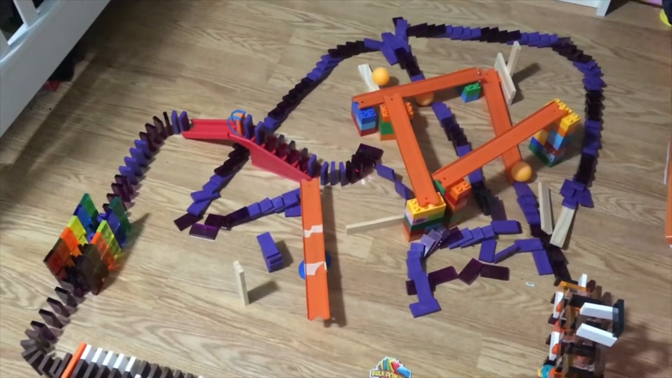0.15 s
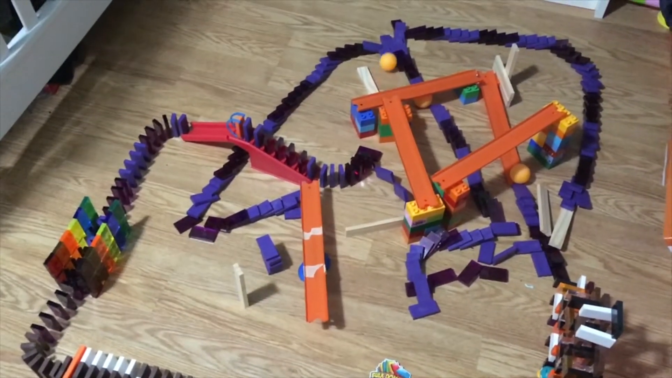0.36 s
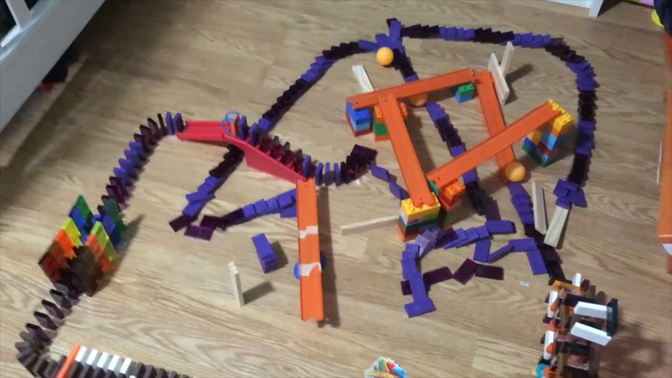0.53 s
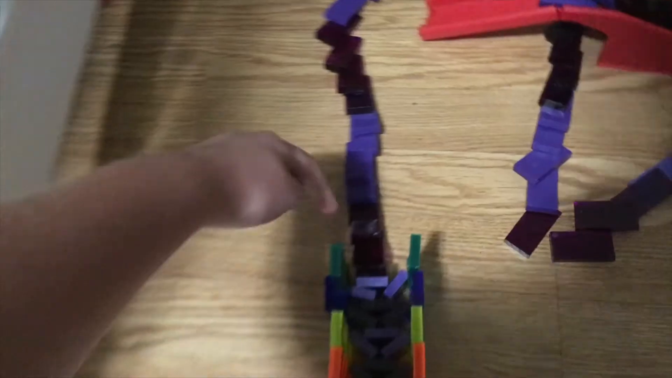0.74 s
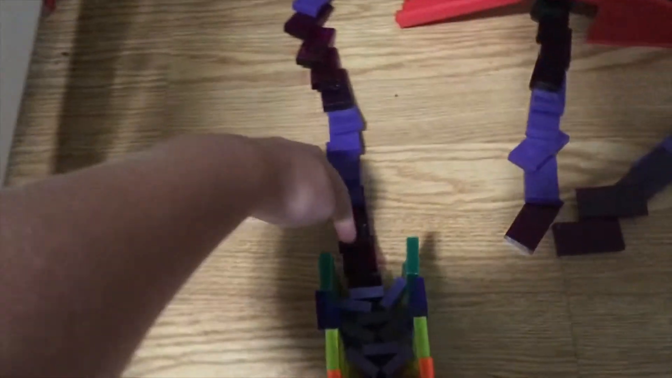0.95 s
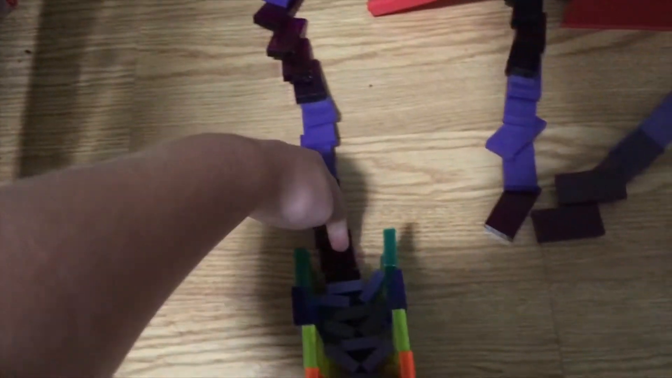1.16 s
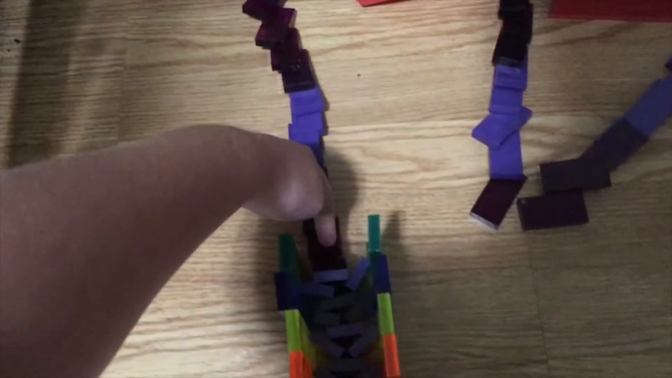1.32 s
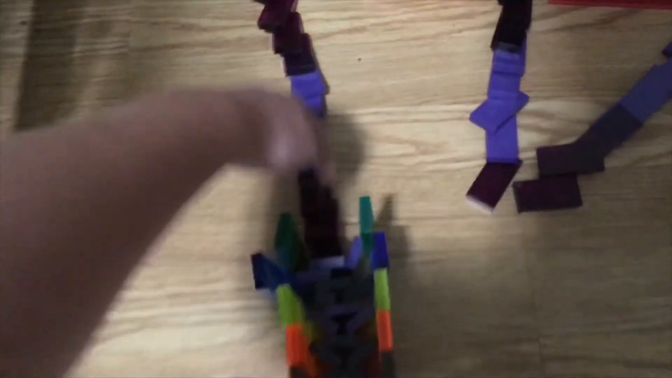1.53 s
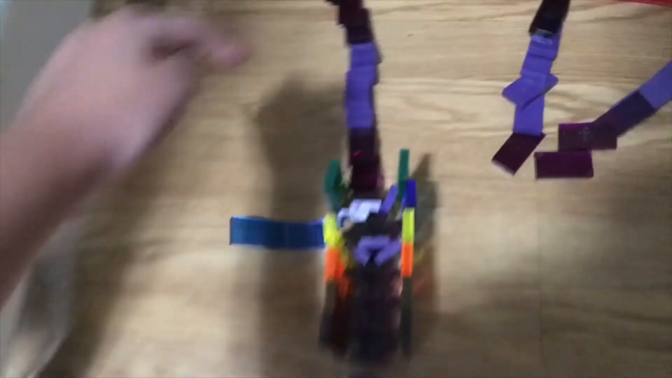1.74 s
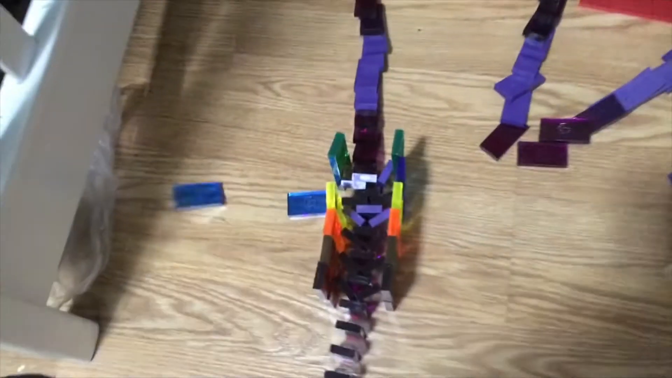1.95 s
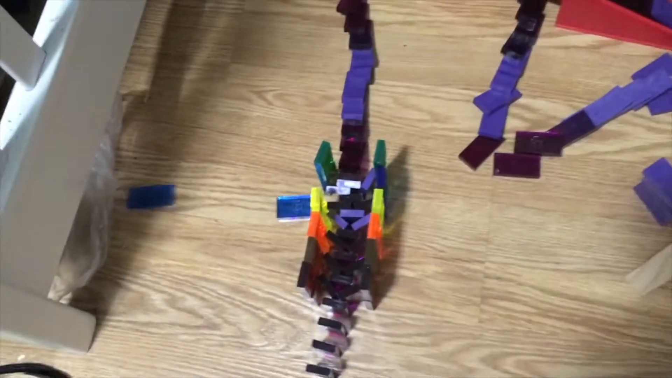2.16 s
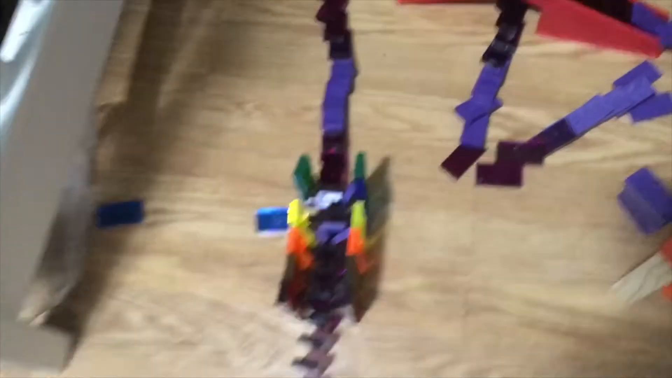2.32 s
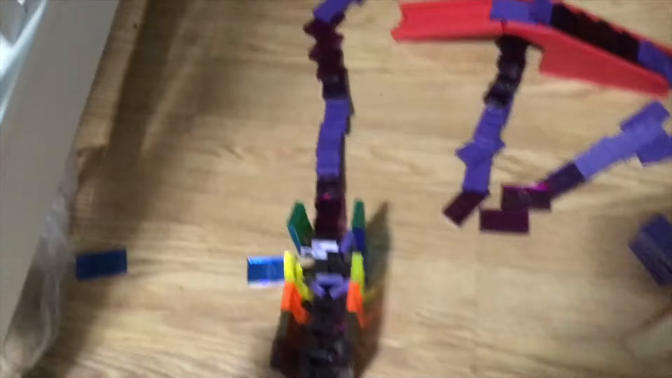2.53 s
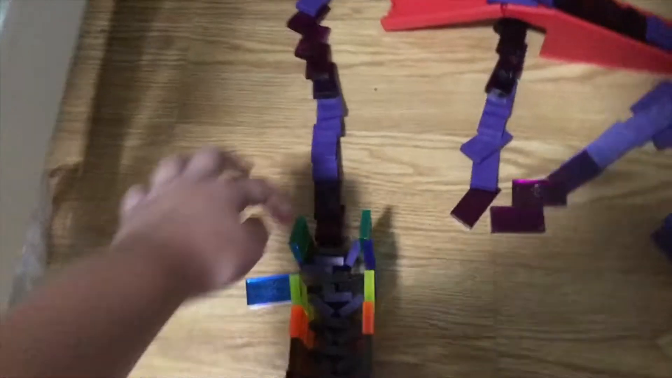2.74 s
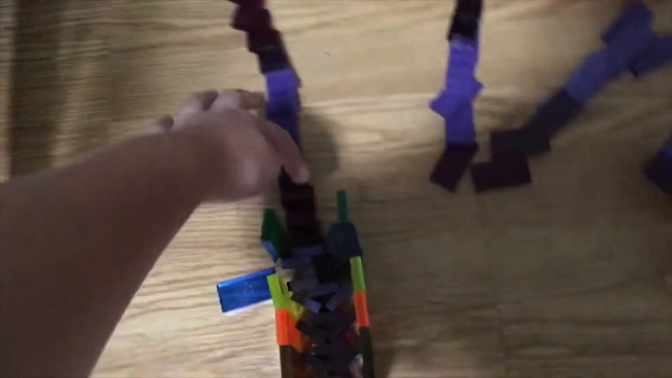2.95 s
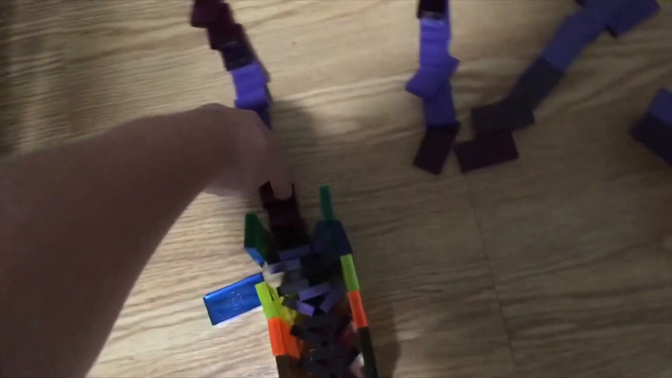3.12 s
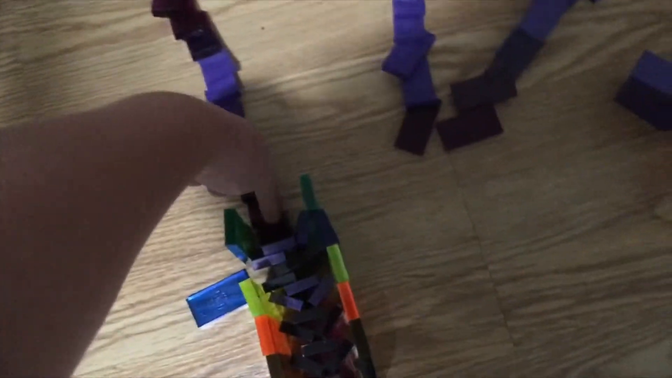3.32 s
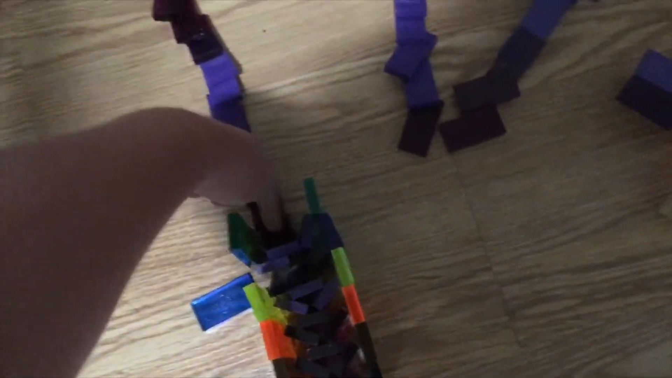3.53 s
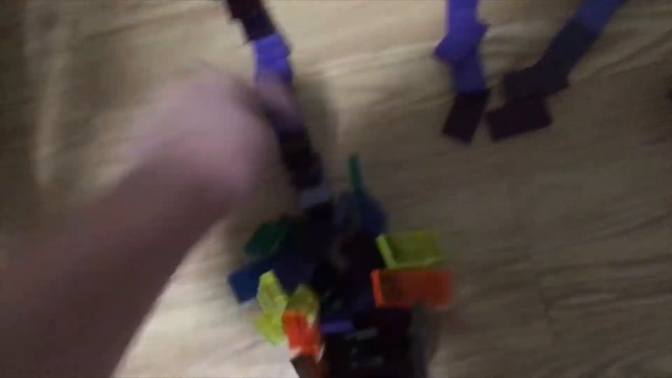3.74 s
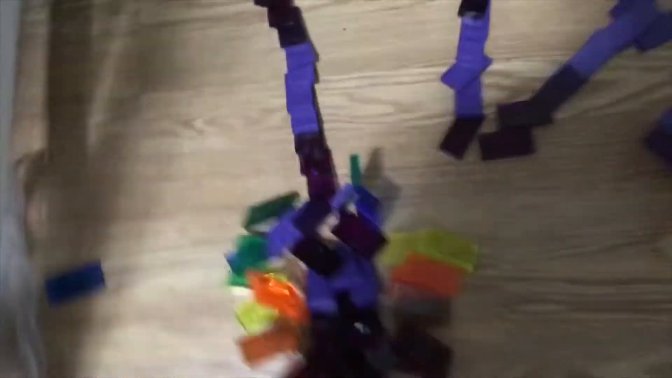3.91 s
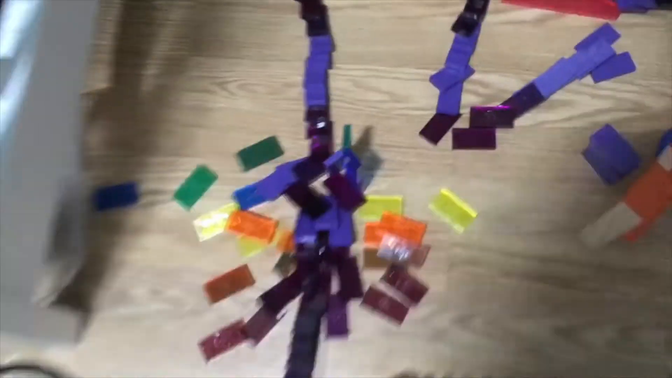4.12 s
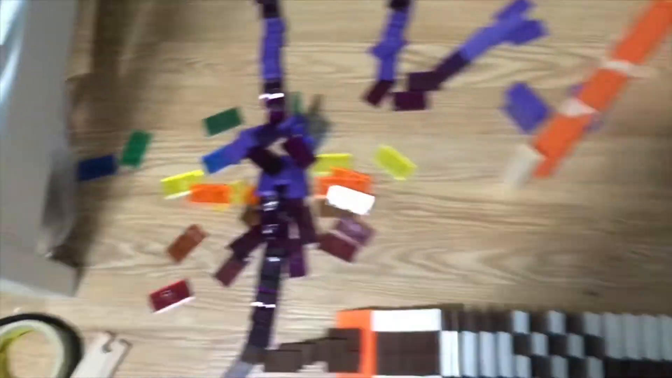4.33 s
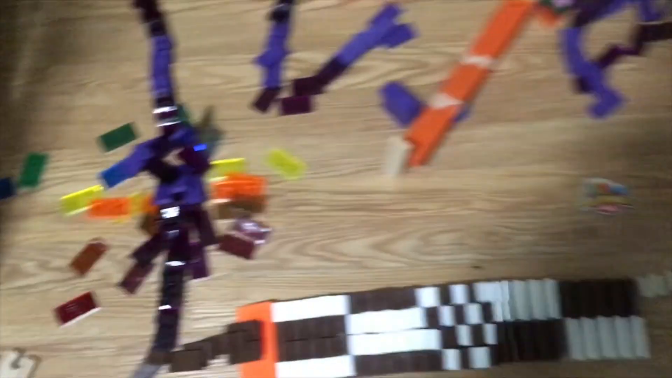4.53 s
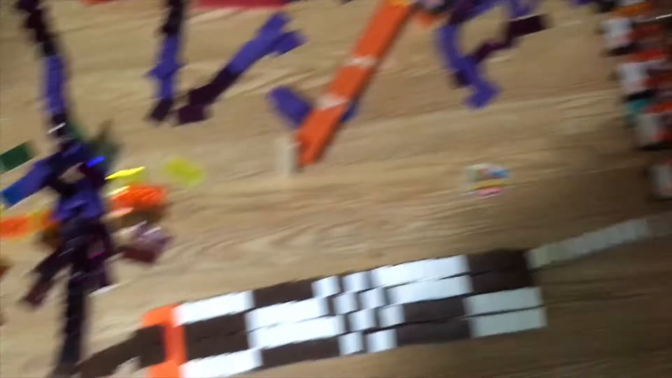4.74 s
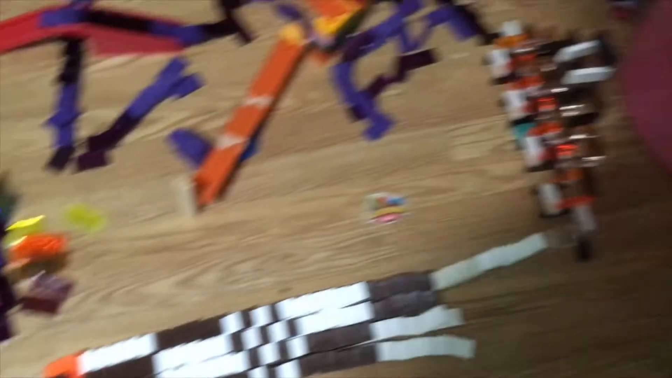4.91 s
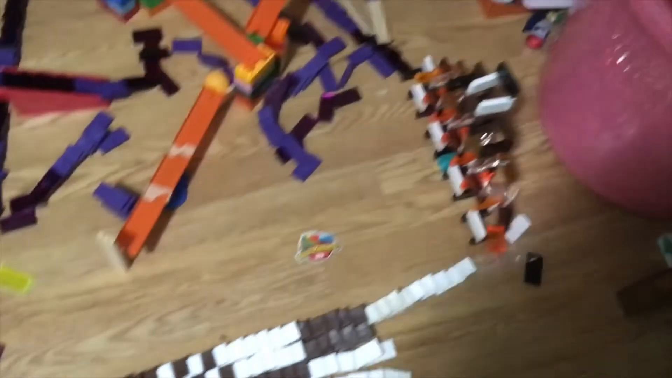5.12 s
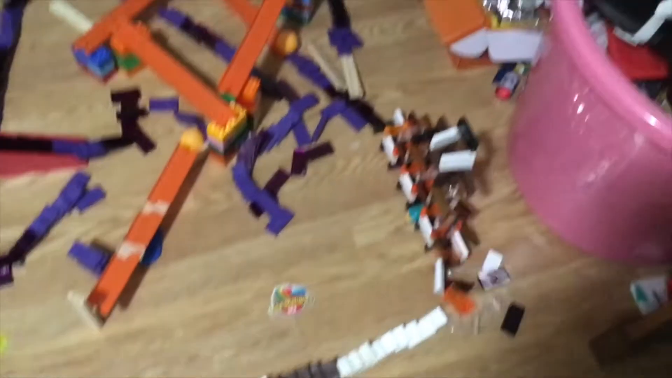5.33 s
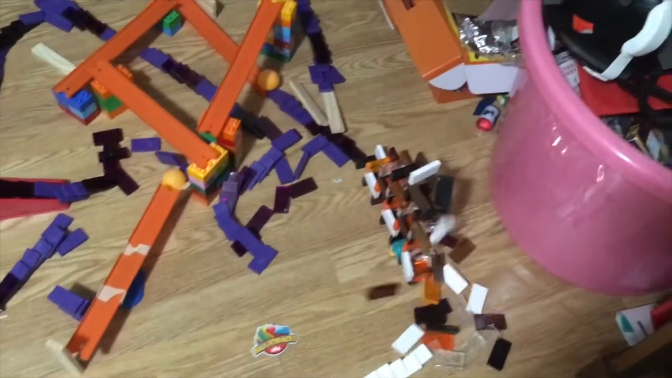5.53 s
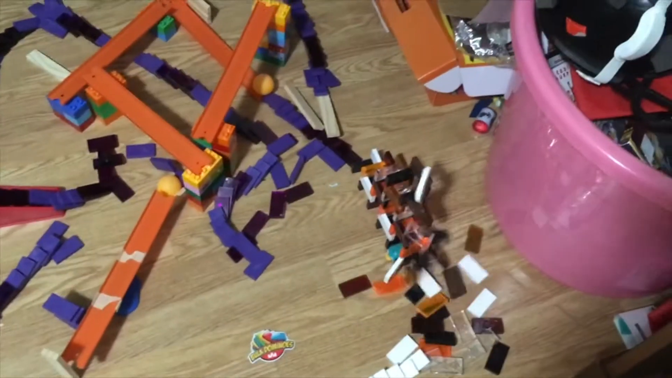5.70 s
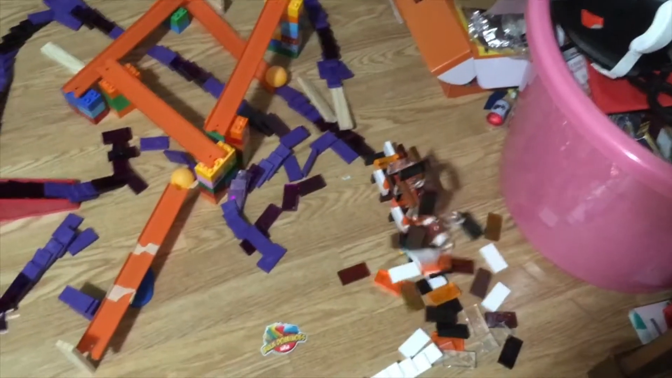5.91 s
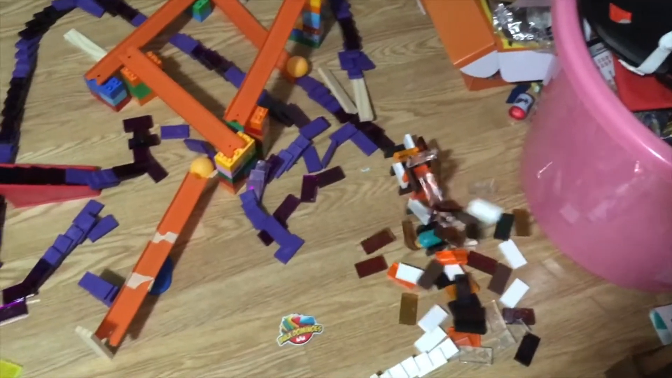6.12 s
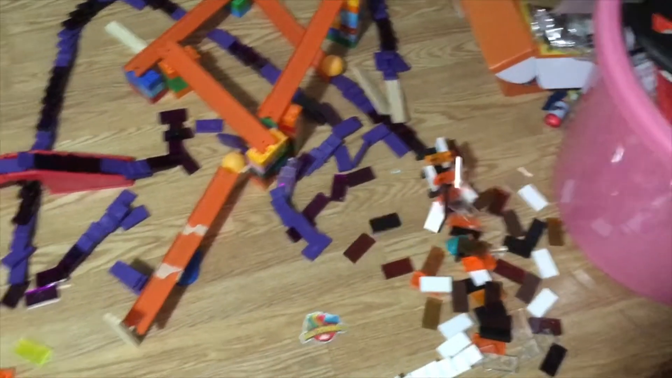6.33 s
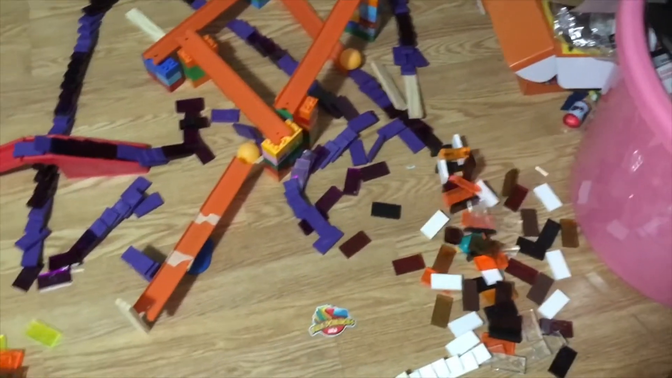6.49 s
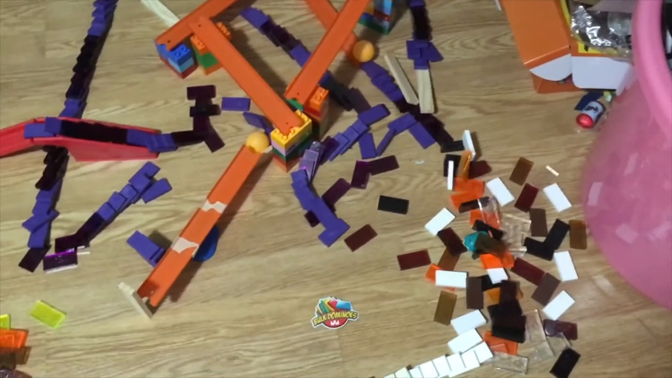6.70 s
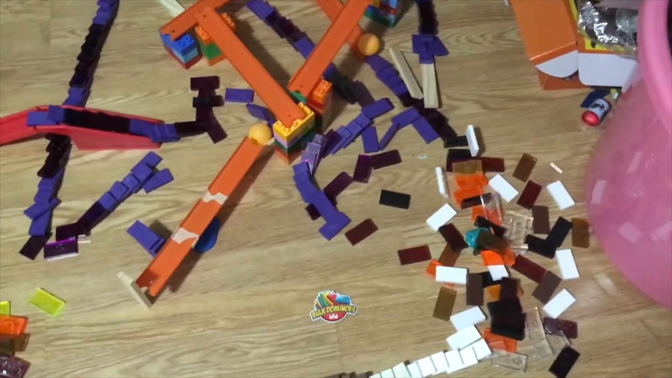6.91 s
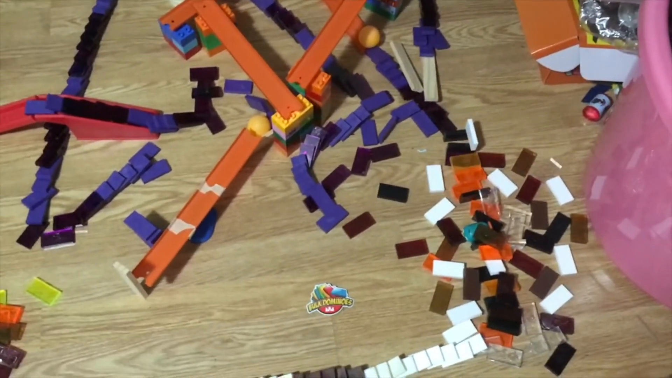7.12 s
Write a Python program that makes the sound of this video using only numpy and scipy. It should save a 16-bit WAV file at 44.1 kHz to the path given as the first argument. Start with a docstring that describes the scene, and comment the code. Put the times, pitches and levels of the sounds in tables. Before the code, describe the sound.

Heard from close above in a small quiet room, a light hollow ball knocks, bounces and rolls out. A few dull taps and a faint scuff follow, and two plastic tiles drop and clack on the laminate floor. After a pause and another push, a stack collapses, a field of dominoes runs down in quick, rising ticks, and a tower crumbles with loud, bright clattering.

```python
"""A small room with a laminate floor, heard from close above: hollow plastic dominoes over a quiet hush.
A light ball knocks, bounces and rolls out; after a few taps and a nudge, two tiles drop off a stack.
Then the stack collapses, a field of tiles runs down in quick ticks, and a long tower crumbles loudly.
Contacts are coloured noise bursts; tile and contact notes are decaying resonators struck by impulses.
A diffuse tail adds the room; a limiter and a low-pass finish the sound."""
import sys
import numpy as np
from scipy import signal
from scipy.fft import rfft, irfft
from scipy.io import wavfile
from scipy.ndimage import uniform_filter1d, minimum_filter1d

SR = 44100
rng = np.random.default_rng(int(sys.argv[2]) if len(sys.argv) > 2 else 0)


def to_wav(sig):
    """Store sig (one row per channel, or 1-D mono) as 16-bit WAV at the path in sys.argv[1].

    Samples outside -1..1 are clipped; the rate is SR.
    """
    pcm = np.clip(np.atleast_2d(sig), -1, 1) * 32767
    pcm = np.round(pcm).astype(np.int16)
    wavfile.write(sys.argv[1], SR, pcm.T)  # frames by channels


N = 320166
TIME_S = np.arange(N) / SR
HIT_S = .01  # a burst level is its rms as if spread over this time


def from_db(db):
    """Decibels to amplitude."""
    return 10 ** (np.asarray(db) / 20)


def at_time(rows, s, column=1):
    """Interpolate a table column at times s."""
    rows = np.array(rows)
    return np.interp(s, rows[:, 0], rows[:, column])


def at_hz(points, hz):
    """Interpolate a spectrum on a log-frequency axis."""
    points = np.array(points)
    return np.interp(np.log(hz), np.log(points[:, 0]), points[:, 1])


def colour(x, spectrum, size=4096):
    """Minimum-phase filter of unit power, falling away beyond the ends of its spectrum."""
    hz = np.maximum(np.arange(size // 2 + 1) * SR / size, 10)
    low_skirt = np.minimum(hz / spectrum[0][0], 1) ** 2
    high_skirt = np.minimum(spectrum[-1][0] / hz, 1) ** 2
    gain = from_db(at_hz(spectrum, hz)) * low_skirt * high_skirt
    cepstrum = irfft(np.log(gain / np.sqrt(np.mean(gain ** 2))))
    # fold the cepstrum to make the filter causal
    cepstrum[1:size // 2] *= 2
    cepstrum[size // 2 + 1:] = 0
    impulse_response = irfft(np.exp(rfft(cepstrum)))
    return signal.oaconvolve(x, impulse_response)[:N]


def band_pass(x, low_hz, high_hz):
    """Second-order Butterworth band."""
    return signal.sosfilt(signal.butter(2, [low_hz, high_hz], "band", fs=SR, output="sos"), x)


def clicks(s, sizes):
    """One impulse at each time."""
    return np.bincount(np.clip(s * SR, 0, N - 1).astype(int), sizes, N)


def bursts(s, db, t60, snap):
    """Noise whose power decays after each contact: a 3 ms snap (power share) plus a rattle of t60 [s]."""
    energy = clicks(s, from_db(db) ** 2 * HIT_S * SR) + 1e-18
    fast, slow = from_db(-120 / (np.array([.003, t60]) * SR))  # power decay per sample
    snap_power = signal.lfilter([1 - fast], [1, -fast], energy)
    rattle_power = signal.lfilter([1 - slow], [1, -slow], energy)
    power = snap * snap_power + (1 - snap) * rattle_power
    return np.sqrt(power) * rng.standard_normal(N)


def rings(s, db, modes, detune, uneven_db, count=14):
    """Decaying modes of count tiles of differing pitch; upper-mode levels vary with the point struck."""
    chance = rng.standard_normal((len(s), len(modes)))
    tile = rng.permutation(count)[np.arange(len(s)) % count]
    out = np.zeros(N)
    for k, spread in enumerate(np.linspace(-1, 1, count)):
        own = tile == k
        pitch = 1 + detune * spread * abs(spread)
        for m, (hz, mode_db, t60) in enumerate(modes):
            r = from_db(-60 / (t60 * SR))
            w = 2 * np.pi * hz * pitch / SR
            strike_db = db[own] + mode_db + uneven_db * chance[own, m] * (m > 0)
            struck = clicks(s[own], from_db(strike_db)) + 1e-18
            out += signal.lfilter([.5, 0, -.5], [1, -2 * r * np.cos(w), r * r], struck)
    return out


def scatter(start_s, end_s, per_s, spread_db):
    """Random contact times and levels, with a mean power of about 0 dB."""
    count = int((end_s - start_s) * per_s)
    chance = rng.random((count, 2))
    s = start_s + (np.arange(count) + chance[:, 0]) / per_s
    db = spread_db * (2 * chance[:, 1] - 1)
    return s, db - 10 * np.log10(np.mean(from_db(db) ** 2) * per_s * HIT_S)


# spectrum of the hush: (frequency [Hz], relative density [dB])
HUSH_SPECTRUM = [(45, 0), (64, 0.5), (127, -2.5), (185, -7.5), (490, -17.5), (1300, -21.5), (2400, -28.5),
                 (16000, -33)]


def room_hush(level_db=-63.5):
    """Steady coloured noise of the quiet room."""
    return from_db(level_db) * colour(rng.standard_normal(N), HUSH_SPECTRUM)


# ball knocks and bounces: (time [s], knock level before trim [dB], crack level before trim [dB])
BALL_KNOCKS = [(.003, -47.5, -42.5), (0.012, -40, -47), (.164, -26, -29), (.278, -37.5, -43.5),
               (0.33, -42.5, -52.5), (.395, -39, -47), (.474, -50, -60), (0.518, -52.5, -73)]
# spectrum of the hollow knock: (frequency [Hz], relative density [dB])
KNOCK_SPECTRUM = [(370, -9.5), (560, 1.5), (850, 1), (1400, 1.5), (2000, -5), (4000, -6.5), (7500, -25.5)]
# spectrum of a hard-edge crack, ball or tile: (frequency [Hz], relative density [dB])
CRACK_SPECTRUM = [(3000, -17), (5000, -9.5), (5700, 4), (7600, -1.5), (9200, 5), (11000, -2), (13000, 6),
                  (15500, -3)]


def knocks(knock_db=2.7, crack_db=4.5):
    """The light ball: a hollow tock with a bright edge and no ring."""
    s, knock, crack = np.transpose(BALL_KNOCKS)
    tock = colour(bursts(s, knock + knock_db, t60=.061, snap=.36), KNOCK_SPECTRUM)
    edge = colour(bursts(s, crack + crack_db, t60=.039, snap=.1), CRACK_SPECTRUM)
    return tock + edge


# reverberation time: (frequency [Hz], t60 [s])
ROOM_T60 = [(200, .34), (1400, .3), (4000, .28), (12000, .21)]
# reverberation level: (frequency [Hz], level [dB])
ROOM_LEVEL = [(200, -7.5), (1400, -4.5), (5600, -7), (12000, -15.5)]


def room(x, first_s=.0051, build_s=.002, count=8):
    """Diffuse noise tail in bands: builds up after the first reflection, dies sooner in the treble."""
    t = TIME_S[:SR]
    build = np.clip((t - first_s) / build_s, 0, 1)
    edges_hz = np.geomspace(80, 18000, count + 1)
    tail = 0
    for low, high in zip(edges_hz, edges_hz[1:]):
        hz = np.sqrt(low * high)
        shape = from_db(-60 * t / at_hz(ROOM_T60, hz)) * build
        noise = rng.standard_normal(len(t)) * shape / np.linalg.norm(shape)
        tail = tail + from_db(at_hz(ROOM_LEVEL, hz)) * band_pass(noise, low, high)
    return signal.oaconvolve(x, tail)[:N]


# rolling strength before the band-pass: (time [s], level [dB])
ROLL_OUT = [(.4, -48), (.47, -53), (.58, -66)]
# spectrum of a clack, also the roll's raw chatter: (frequency [Hz], relative density [dB])
CLACK_SPECTRUM = [(250, -13.5), (520, -7), (1000, -2.5), (1700, -3.5), (2800, -1), (3900, 0), (4900, -5.5),
                  (7500, -8.5)]


def roll():
    """The ball chatters finely as it rolls out: dense tiny contacts, band-passed."""
    s, db = scatter(ROLL_OUT[0][0], ROLL_OUT[-1][0], per_s=300, spread_db=2)
    db = db + at_time(ROLL_OUT, s)
    chatter = colour(bursts(s, db, t60=.015, snap=.33), CLACK_SPECTRUM)
    return band_pass(chatter, 900, 2800)


# small dry taps: (time [s], level [dB])
NEAR_TAPS = [(.7105, -42), (.8005, -60), (1.337, -60), (1.9095, -39), (1.937, -37), (1.968, -46),
             (2.0, -39)]
# spectrum of a tap: (frequency [Hz], relative density [dB])
TAP_SPECTRUM = [(200, -23.5), (550, 4), (1200, -0.5), (2200, -1), (4000, -13), (8000, -18), (15000, -21)]


def taps():
    """Short dull ticks, too near and weak to stir the room."""
    s, db = np.transpose(NEAR_TAPS)
    return colour(bursts(s, db, t60=.014, snap=.3), TAP_SPECTRUM)


# soft low thuds through the floor: (time [s], level [dB])
FLOOR_THUDS = [(.98, -49), (1.338, -43.5), (1.76, -52), (3.83, -43.5), (4.03, -54), (4.5, -47)]
# spectrum of a thud: (frequency [Hz], relative density [dB])
THUD_SPECTRUM = [(45, -4), (85, 2.5), (180, -14.5)]


def thuds():
    """Weight shifts on the floor and it rumbles briefly."""
    s, db = np.transpose(FLOOR_THUDS)
    return colour(bursts(s, db, t60=.4, snap=0), THUD_SPECTRUM)


# scuffing as a finger presses the stack: (time [s], level [dB])
NUDGE_PRESSURE = [(1.34, -75), (1.41, -52.5), (1.445, -47.5), (1.47, -58.5)]
# scuffing of the later push: (time [s], level [dB])
PUSH_PRESSURE = [(3.607, -54.5), (3.648, -44.5), (3.66, -27), (3.7, -37), (3.74, -41), (3.8, -33.5)]
# spectrum of a scuff: (frequency [Hz], relative density [dB])
SCUFF_SPECTRUM = [(250, -2), (600, -9), (1100, -4.5), (1550, 6), (2100, -4.5), (2800, -6.5), (3800, -15),
                  (4250, -5), (4900, -19), (6100, -2), (7500, -22.5), (15000, -18.5)]
# nominal bending modes of a tile: (frequency [Hz], level [dB], t60 [s])
TILE_MODES = [(5605, -1, .085), (5420, -8, .04), (6150, -9, .065), (12900, 0, .04), (13970, -2, .055)]


def scuff(pressure, ring_db=-8.5):
    """Leaning tiles scuff on each other: quick small slips, each ringing the tiles a little."""
    s, db = scatter(pressure[0][0], pressure[-1][0], per_s=300, spread_db=11.0)
    db = db + at_time(pressure, s)
    slips = colour(bursts(s, db, t60=.029, snap=.19), SCUFF_SPECTRUM)
    return slips + rings(s, db + ring_db, TILE_MODES, detune=.03, uneven_db=4.5)


# typical first gap, each gap as a share of the one before, mean loss per bounce
BOUNCE_S, BOUNCE_SHRINK, BOUNCE_LOSS_DB = .008, .8, 6.5


def bounces(s, levels, uneven=.35, uneven_db=2.5, count=3):
    """Landings and rebounds, on average ever quicker and weaker: times, then each set of levels."""
    k = np.arange(count)
    early, strong = rng.standard_normal((len(s), count, 2)).transpose(2, 0, 1)
    gaps_s = BOUNCE_S * BOUNCE_SHRINK ** (k - 1.0) * (k > 0) * np.exp(uneven * early)
    loss_db = BOUNCE_LOSS_DB * k - uneven_db * strong * (k > 0)
    times = (s[:, None] + np.cumsum(gaps_s, axis=1)).ravel()
    return times, *[(db[:, None] - loss_db).ravel() for db in levels]


# nominal notes of a contact: (frequency [Hz], level [dB], t60 [s])
CONTACT_NOTES = [(1100, -2.5, 0.018), (3270, -4.5, 0.019)]
# floor boom against the clack, most under the tower: (time [s], level [dB])
FLOOR_GIVE = [(2.3, -24), (3.8, -19.5), (5.6, -15)]
# spectrum of the floor panel: (frequency [Hz], relative density [dB])
BOOM_SPECTRUM = [(110, -28), (130, -13), (158, 0.5), (180, -8.5), (260, 3), (345, -3), (400, -2.5),
                 (560, -16)]


def strike(s, clack_db, crack_db, snap, note_db=-3.0):
    """A falling tile: mid clack, a note set by how it lands, hard-edge crack and floor-panel boom."""
    clack = colour(bursts(s, clack_db, t60=.032, snap=snap), CLACK_SPECTRUM)
    note = rings(s, clack_db + note_db, CONTACT_NOTES, detune=.4, uneven_db=5.5)
    crack = colour(bursts(s, crack_db, t60=.028, snap=.3), CRACK_SPECTRUM)
    boom_db = clack_db + at_time(FLOOR_GIVE, s)
    boom = colour(bursts(s, boom_db, t60=.053, snap=.32), BOOM_SPECTRUM)
    return clack + note + crack + boom


# loudest landings, on floor or tiles, levels before trim:
# (time [s], crack level [dB], clack level [dB], ring level [dB])
BIG_LANDINGS = [(1.4511, -24, -37.5, -37), (1.8081, -14.5, -19.5, -22.5), (1.8252, -11.5, -16.5, -12.5),
                (2.0295, -11.5, -23, -18.5), (2.1234, -34, -33.5, -52), (2.1382, -15.5, -24, -22),
                (2.2003, -32, -33.5, -33.5), (2.2342, -25, -30, -28), (2.2818, -38, -39, -42),
                (3.6613, -21, -32, -29), (3.8082, -32, -27.5, -35), (3.8237, -26, -18, -20),
                (3.8375, -8, -22, -11.5), (3.911, -11.5, -21.5, -18.5), (3.9506, -18, -29.5, -18),
                (4.0229, -16, -23, -22), (4.065, -14, -24.5, -26.5), (4.1618, -16, -25, -23),
                (4.2242, -14, -29, -22), (4.2366, -16, -36, -25), (4.284, -17, -26.5, -24.5),
                (4.345, -23, -29, -33), (4.3838, -16, -28.5, -43), (4.8362, -8.5, -25.5, -50),
                (5.0698, -8, -25, -21), (5.1587, -21, -27, -28), (5.1933, -31, -21, -34),
                (5.2623, -17, -17.5, -30), (5.3937, -13, -25, -32), (5.4193, -12, -11, -16),
                (5.5066, -4, -17, -20), (5.5433, -11.5, -26.5, -17), (5.6282, -17, -33, -16),
                (5.6946, 1, -17.5, -9.5), (5.7823, -13, -16, -22.5), (5.798, -11, -30, -43),
                (5.912, -9, -22, -30), (6.0088, -21, -23, -22), (6.0556, -12, -27, -23.5),
                (6.0874, -26, -23, -16.5), (6.135, -3.5, -19.5, -34), (6.2037, -16, -23, -19),
                (6.2463, -6, -20.5, -19), (6.322, -23, -30, -24.5), (6.3408, -10, -21.5, -16),
                (6.4199, -27, -32, -21.5), (6.4778, -22, -28, -26), (6.4947, -6.5, -19, -18.5),
                (6.5786, -35, -22, -24), (6.6206, -19, -30, -20), (6.6756, -13, -44, -21),
                (6.8967, -23, -27, -38), (6.9302, -23, -27, -28.5), (7.0226, -21, -26, -25)]


def big_hits(clack_db=-2.0, crack_db=-11.0, ring_db=4.0):
    """Tiles that land hard, bounce and ring freely."""
    s, *levels = np.transpose(BIG_LANDINGS)
    s, crack, clack, ring = bounces(s, levels)
    impacts = strike(s, clack + clack_db, crack + crack_db, snap=.17)
    return impacts + rings(s, ring + ring_db, TILE_MODES, detune=.011, uneven_db=1.5)


# strength of the stack's crumbling, before trim: (time [s], level [dB])
STACK_VIGOUR = [(3.8, -55), (3.832, -32.5), (3.998, -25), (4.258, -32.5), (4.4, -42)]
# strength of the tower's crumbling, before trim: (time [s], level [dB])
TOWER_VIGOUR = [(5.03, -32.5), (5.27, -32), (5.59, -26.5), (5.81, -30), (6.13, -25.5), (6.31, -32.5),
                (6.63, -30), (6.82, -34), (6.93, -39.5), (6.98, -37.5), (7.07, -30)]


def jostle(vigour, clack_db, crack_db, ring_db, edge_db=2.0):
    """Many light landings, as strong as the collapse at that moment; edge landings are brighter."""
    s, db = scatter(vigour[0][0], vigour[-1][0], per_s=90, spread_db=7.0)
    db = db + at_time(vigour, s)
    bright_db = db + edge_db * rng.standard_normal(len(s))
    s, db, bright_db = bounces(s, [db, bright_db])
    ringing = rings(s, bright_db + ring_db, TILE_MODES, detune=.03, uneven_db=5.0)
    return strike(s, db + clack_db, bright_db + crack_db, snap=.063) + ringing


FIELD_START_S, RANK_GAP_S, FIRST_GAP_S = 4.4066, .0195, .023
SETTLE_RANKS, RANK_JITTER_S = 2.2, .001


def rank_times(count=31):
    """Ranks tip one after another, the gap easing to a steady value as the front gathers speed."""
    k = np.arange(count)
    gaps_s = RANK_GAP_S + (FIRST_GAP_S - RANK_GAP_S) * np.exp(-k / SETTLE_RANKS)
    onsets_s = FIELD_START_S + np.cumsum(gaps_s) - gaps_s
    return onsets_s + RANK_JITTER_S * rng.standard_normal(count)


# strength of the front through field and line, before trim: (time [s], level [dB])
FRONT_STRENGTH = [(4.405, -26), (4.509, -22.5), (4.809, -23.5), (4.821, -20), (4.939, -23.5), (5.01, -23)]
# rising hollow note of the field: (time [s], centre frequency [Hz])
FIELD_NOTE = [(4.4, 1493), (4.65, 1949), (4.9, 2491)]
# spectrum of the ticks: (frequency [Hz], relative density [dB])
FIELD_SPECTRUM = [(250, -14), (400, -5), (1000, -3), (2500, -4), (3700, -22), (4300, 4.5), (5000, -16),
                  (6100, 4), (8200, -12.5), (9600, -0.5), (10600, 0.5), (13000, -25.5), (15300, -3.5)]
# nominal modes of the line's tiles: (frequency [Hz], level [dB], t60 [s])
LINE_MODES = [(4580, -2, .04), (5430, 0, .05), (11420, -1, .03), (13700, 0, .03)]


def field(tick_db=-6.0, lanes_spread_s=.008, note_db=13.5, note_width_hz=450, line_start_s=4.85,
          line_db=-5.5, ring_db=-1.5, ring_rise_db_per_s=45, uneven_db=.93, count=4):
    """Lanes tip a moment apart, damped by neighbours; the line at the end is softer, its ring rising."""
    s = rank_times()
    line = s > line_start_s
    db = at_time(FRONT_STRENGTH, s) + line_db * line + uneven_db * rng.standard_normal(len(s))
    lags_s = lanes_spread_s * (np.arange(count) + rng.uniform(-.43, .38, (len(s), count))) / count
    tick_s = (s[:, None] + lags_s).ravel()
    ticks = bursts(tick_s, np.repeat(db, count) + tick_db, t60=.03, snap=.12)
    # low-passed ticks on a gliding carrier: a broad resonance
    swell = signal.sosfilt(signal.butter(2, note_width_hz, fs=SR, output="sos"), ticks)
    carrier = np.cos(2 * np.pi * np.cumsum(at_time(FIELD_NOTE, TIME_S)) / SR)
    note = from_db(note_db) * swell * carrier
    free_db = db + ring_db + ring_rise_db_per_s * (s - line_start_s)
    ringing = rings(s[line], free_db[line], LINE_MODES, detune=.017, uneven_db=4.0)
    return colour(ticks, FIELD_SPECTRUM) + note + ringing


def settling(clack_db=-10.5, crack_db=-13.5):
    """Behind the front, leaning tiles slip down on each other without free tile ringing."""
    s, db = scatter(FRONT_STRENGTH[0][0], TOWER_VIGOUR[0][0], per_s=200, spread_db=5)
    db = db + at_time(FRONT_STRENGTH, s)
    return strike(s, db + clack_db, db + crack_db, snap=.081)


def scene():
    """Ball and tiles excite the room; taps, thuds and hush stay dry."""
    stack = jostle(STACK_VIGOUR, clack_db=-4.0, crack_db=-9.0, ring_db=-6.0)
    tower = jostle(TOWER_VIGOUR, clack_db=-2.5, crack_db=-7.5, ring_db=-2.0)
    ball = knocks() + roll()
    tiles = big_hits() + stack + field() + settling() + tower
    sources = ball + tiles + scuff(NUDGE_PRESSURE) + scuff(PUSH_PRESSURE)
    hush = room_hush()
    return (sources + room(sources) + taps() + thuds() + hush)[None]


def record(dry, ceiling=.45, size=65, cutoff_hz=16000):
    """A fast limiter (window of size samples) holds the peaks; a steep low-pass cuts the top."""
    gain = np.minimum(1, ceiling / (np.abs(dry) + 1e-9))
    limited = dry * uniform_filter1d(minimum_filter1d(gain, size), size)
    return signal.sosfilt(signal.ellip(12, .1, 80, cutoff_hz, fs=SR, output="sos"), limited)


dry = scene()
out = record(dry)
to_wav(out)
```